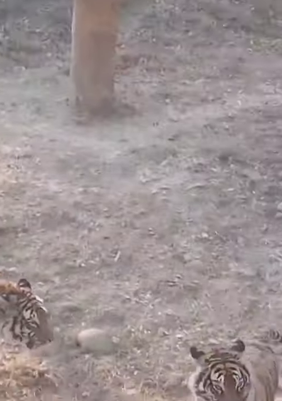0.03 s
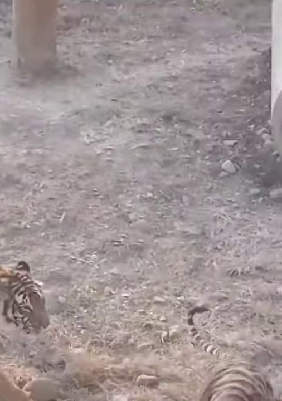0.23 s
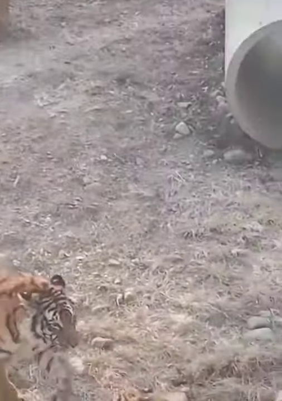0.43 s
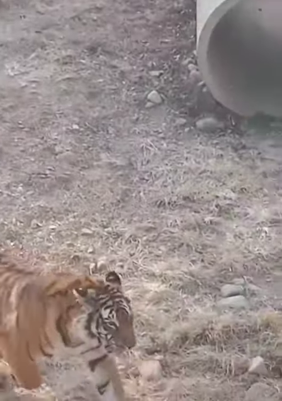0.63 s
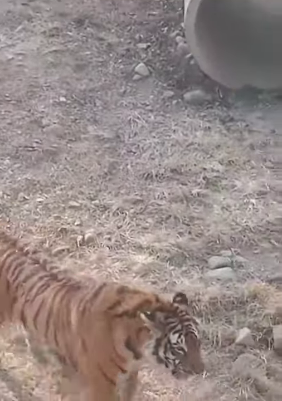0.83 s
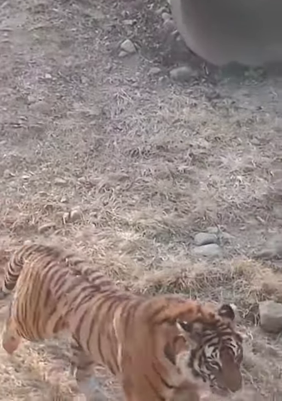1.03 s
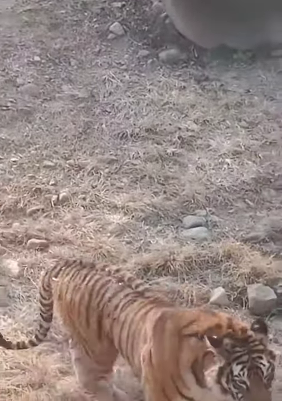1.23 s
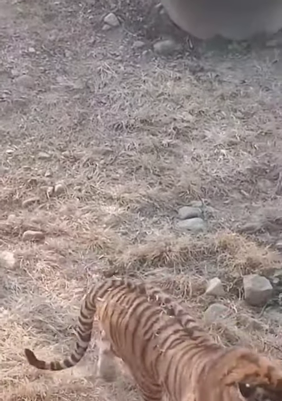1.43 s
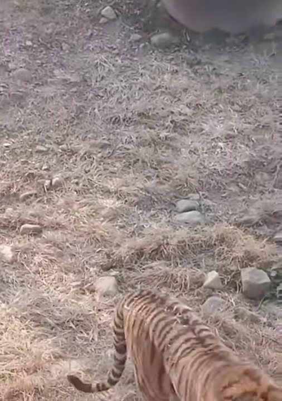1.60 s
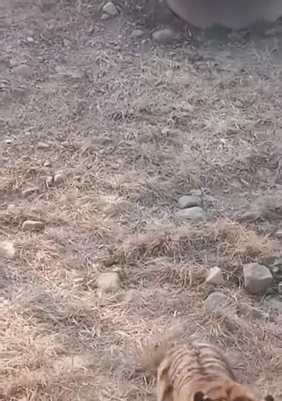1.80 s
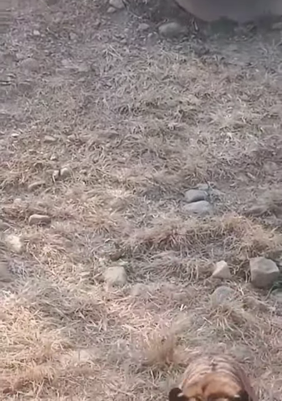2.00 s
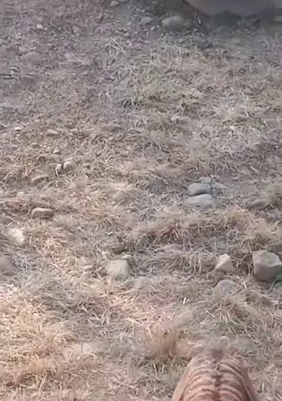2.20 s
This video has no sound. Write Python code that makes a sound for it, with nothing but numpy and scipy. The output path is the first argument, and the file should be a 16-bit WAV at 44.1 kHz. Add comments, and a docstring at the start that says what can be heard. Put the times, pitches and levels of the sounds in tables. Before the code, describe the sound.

A tiger starts with a rough, throbbing growl on an in-breath. At about 0.4 seconds it breathes out in a raspy roar that fades by 1.1 seconds. A second, quieter growl follows with small catches in the throat. At about 1.7 seconds comes the loudest roar, rising in pitch, then falling away just after 2 seconds. A nearby phone picks up short echoes and faint outdoor air.

```python
"""One big cat on open ground growls as it breathes in and roars as it breathes out, twice over.
Its vocal folds beat unevenly and its breath rushes, both throbbing as loose tissue flaps.
This makes the chest, throat, mouth and nose ring; now and then the throat catches and bursts open.
Behind it are faint outdoor air and short echoes, all heard through a nearby phone."""
import sys
import numpy as np
from scipy import signal
from scipy.fft import rfft, irfft
from scipy.io import wavfile
from scipy.ndimage import uniform_filter1d, map_coordinates

SR = 44100
rng = np.random.default_rng(int(sys.argv[2]) if len(sys.argv) > 2 else 0)


def to_wav(sig):
    """Store sig (one row per channel, or 1-D mono) as 16-bit WAV at the path in sys.argv[1].

    Samples outside -1..1 are clipped; the rate is SR.
    """
    pcm = np.clip(np.atleast_2d(sig), -1, 1) * 32767
    pcm = np.round(pcm).astype(np.int16)
    wavfile.write(sys.argv[1], SR, pcm.T)  # frames by channels


N = 99357


def amp(db):
    """Turns decibels into a number to multiply by."""
    return 10 ** (np.asarray(db) / 20)


def unit_level(x):
    """Scales a sound to an average power of 1."""
    return x / np.sqrt(np.mean(x ** 2) + 1e-20)


def steady(x):
    """Evens out loudness changes slower than about 35 ms, keeping the fine grain."""
    power = abs(uniform_filter1d(x ** 2, int(0.035 * SR)))
    return x / np.sqrt(power + 0.006 * np.mean(x ** 2) + 1e-20)


def look_up(points, hz):
    """Reads between the rows of a frequency table."""
    f, value = np.transpose(points)
    return np.interp(np.log(hz + 1), np.log(f + 1), value)


def colour(x, points):
    """Turns lows and highs up or down by a table of f/Hz, level/dB."""
    return irfft(rfft(x) * amp(look_up(points, np.fft.rfftfreq(len(x), 1 / SR))), len(x))


def wander(count, per_s):
    """A smooth random wiggle, about 1 in size, that changes about per_s times a second."""
    steps = rng.standard_normal(int(count / SR * 400) + 3)
    return map_coordinates(steps, [np.arange(count) / SR * per_s], order=3, prefilter=False) * 1.45


def resonate(x, hz, width):
    """A hollow space rings near hz, which may move: shift the sound down, smooth twice, shift back."""
    spin = np.exp(2j * np.pi * np.cumsum(hz * np.ones(len(x))) / SR)
    r = np.exp(-np.pi * width / SR)
    return 2 * (spin * signal.lfilter([(1 - r) ** 2], [1, -2 * r, r * r], x / spin + 1e-18)).real


def drifting_ring(x, hz, width):
    """A hollow space whose note drifts by a few percent."""
    return unit_level(resonate(x, hz * (1 + 0.046 * wander(len(x), 9.25)), width))


# Tone of the outdoor air: f/Hz, level/dB
AIR_TONE = [(40, 5.5), (150, 4), (500, 2), (1000, -2.5), (7000, -24), (12000, -25)]
def outdoor_air(level_db=-43):
    """A faint, even rush of mostly low noise."""
    return amp(level_db) * unit_level(colour(rng.standard_normal(N), AIR_TONE))


def echoes(x, fade_s=0.26, level_db=-7):
    """Sound scatters back off the ground and walls and soon dies away."""
    t = np.arange(SR // 2) / SR
    tail = rng.standard_normal(len(t)) * amp(-60 * t / fade_s) * (t > .004)
    return amp(level_db) * signal.fftconvolve(x, tail / np.linalg.norm(tail))[:N]


# How much louder the left side is than the right: f/Hz, level/dB
LEFT_LEAN = [(480, -.5), (800, .5), (1350, 3.5), (3800, 4.5), (6000, -1.5)]
# How far the left wave runs ahead of the right: f/Hz, phase/rad
LEFT_LEAD = [(3000, 0), (4300, 5), (9000, -2.5)]
# Smeared sound, added on the left and taken away on the right: f/Hz, level/dB
SPREAD = [(60, -36), (125, -33), (250, -18), (500, -12), (800, -10), (1300, -1), (2500, -8), (6000, -5)]
def two_microphones(x):
    """The sound reaches the phone's left and right openings with its own level and timing."""
    hz = np.fft.rfftfreq(N, 1 / SR)
    smear = rfft(rng.standard_normal(4000) * amp(-40 * np.arange(4000) / 4000), N)
    lean, lead = amp(look_up(LEFT_LEAN, hz) / 2), np.exp(.5j * look_up(LEFT_LEAD, hz))
    middle = rfft(x)
    side = middle * amp(look_up(SPREAD, hz)) * smear / abs(smear)
    return irfft(np.array([(middle + side) * lean * lead, (middle - side) / lean / lead]), N)


# Loudness of the breath's hiss: t/s, level/dB
HISS_LEVELS = [(0.1, -58), (0.38, -65), (0.42, -40), (0.6, -40), (0.75, -47.5), (1.09, -51.5), (1.2, -60),
               (1.62, -74), (1.71, -45.5), (1.9, -50.5), (2.18, -69.5)]
# Tone of that hiss: f/Hz, level/dB
HISS_TONE = [(4000, -41), (5000, 7.5), (6600, -4.5), (9000, -16)]
def breath_hiss(t, breath):
    """Rushing breath makes a high, flickering hiss."""
    level_db = np.interp(t, *np.transpose(HISS_LEVELS)) + 2.5 * wander(len(t), 20)
    return amp(level_db) * steady(colour(breath, HISS_TONE))


# Moments when the throat bursts open and rings: t/s, level/dB, f/Hz
THROAT_SNAPS = [(0.25, -13.5, 709), (0.862, -19.5, 635), (1.255, -12, 784), (1.383, -22.5, 780),
                (1.485, -16, 773), (1.523, -20.5, 383), (1.566, -26, 356), (1.734, 1, 754),
                (1.871, -4, 630), (1.934, -3.5, 613), (2.062, -13.5, 857)]
def throat_snaps(t, width_hz=47, rise_s=.002, settle_s=.014):
    """The throat catches, then pops open. Gives the pops and the dip and swell of the airflow."""
    marks, pops = np.zeros((2, len(t)))
    for at, level_db, hz in THROAT_SNAPS:
        if t[0] <= at < t[-1]:
            marks[int((at - t[0]) * SR)] = 1
            age = np.maximum(t - at, 0)
            shape = np.tanh(age / rise_s) ** 2 * np.exp(-np.pi * width_hz * age)
            pops += amp(level_db) * shape * np.sin(2 * np.pi * hz * age)
    fading = lambda x: signal.lfilter([1], [1, -np.exp(-1 / (settle_s * SR))], x)
    choke = np.minimum(fading(marks[::-1])[::-1] - marks, 1)  # builds up just before each pop
    flow = 1 + .7 * fading(marks) - .55 * choke
    return pops, uniform_filter1d(flow, size=int(rise_s * SR))


# High rings of the rasp: f/Hz, width/Hz, then level/dB in each of the four calls
RASP_RINGS = [(1337, 370, -3, -3.5, -6, 4), (1855, 420, -8, -9, -2.5, -1.5), (2302, 796, -12, -8, -3, -1),
              (3528, 770, -9.5, -9, -15.5, -7)]
def rasp(drive, which):
    """Breathy pulses stir several high rings, each flickering on its own."""
    sound = 0
    for k, (hz, width, *levels_db) in enumerate(RASP_RINGS):
        flicker_db = 2.5 * wander(len(drive), 23.94)
        sound += (-1) ** k * amp(levels_db[which] + flicker_db) * drifting_ring(drive, hz, width)
    return steady(sound)


# Broad sound that spills between the rings: f/Hz, level/dB
SPILL_TONE = [(40, -25.5), (90, 2.5), (250, 10), (700, 17), (1000, -25), (1200, -76), (2500, -15)]
# Hollows beside the mouth: f/Hz, width/Hz, then level/dB against the mouth in each of the four calls
SIDE_HOLLOWS = [(487.5, 71, -15, -2.5, -9.5, -5.5), (648.3, 46, -8, -8, -9, -17)]
def mouth(drive, hz, width, which):
    """The mouth rings at a moving note, with weaker rings from the hollows beside it."""
    sound = unit_level(resonate(drive, hz, width)) + amp(-18) * unit_level(colour(drive, SPILL_TONE))
    for side_hz, side_width, *levels_db in SIDE_HOLLOWS:
        sound += amp(levels_db[which]) * drifting_ring(drive, side_hz, side_width)
    return steady(sound)


def chest_voice(drive, throb, pitch, width, waver, breathy, rumble_db):
    """The voice's lowest note, part pure and part breathy, over the rumble of the chest."""
    cycles = np.cumsum(pitch * (1 + waver * wander(len(drive), 41.2))) / SR
    pure = unit_level(np.sin(2 * np.pi * cycles) * throb ** .5)
    rough = unit_level(resonate(drive, pitch, width))
    rumble = amp(rumble_db) * drifting_ring(drive, hz=96, width=64)
    return steady((1 - breathy) * pure + breathy * rough) + rumble


def flapping_tissue(n, flap_hz, depth_db):
    """Loose tissue flaps unevenly: with each flap the loudness jumps up, then sinks."""
    flaps = np.cumsum(flap_hz * (1 + .45 * wander(n, 25))) / SR + rng.random()
    swing_db = depth_db * (1 - 2 * (flaps % 1)) * (1 + .5 * wander(n, 39))
    return amp(uniform_filter1d(swing_db, size=130))


def vocal_folds(pitch, jitter=.35, shimmer_db=2.5):
    """Each beat of the folds, uneven in timing and strength, gives a sharp pulse and a puff of air."""
    n = len(pitch)
    beats = np.cumsum(pitch * np.clip(1 + jitter * wander(n, 200), .2, 3)) / SR
    pulses = np.diff(np.floor(beats), prepend=0) * amp(shimmer_db * rng.standard_normal(n))
    puffs = (.5 + np.exp(-(beats % 1) / 0.86)) * rng.standard_normal(n)
    return unit_level(pulses - pulses.mean()), unit_level(puffs)


# Character of each call: throat width/Hz, voice width/Hz, mouth width/Hz, flap rate/Hz, throb/dB,
# air share/0-1, pitch waver/0-1, breathy share/0-1, chest rumble against the voice/dB
CALL_STYLES = [(110, 110, 130, 34, 6.5, 0.58, .06, 0.6, -1.5), (22.2, 41, 124, 26, 3, 0.47, 0.05, 0.44, -5),
               (110, 87, 130, 30, 5, 0.34, 0, 0.8, -2), (56.3, 56, 205, 30, 2, 0.52, 0, 0.35, -31)]
def cat_call(t, rows, which, rasp_air=.76):
    """One growl or roar (which = 0 to 3): throbbing pulses and air ring chest, throat, mouth and nose."""
    throat_width, voice_width, mouth_width, flap_hz, throb_db = CALL_STYLES[which][:5]
    air, waver, breathy, rumble_db = CALL_STYLES[which][5:]
    times, *columns = np.transpose(rows)
    curves = (np.interp(t, times, column) for column in columns)
    pitch, voice_db, throat_hz, throat_db, mouth_hz, mouth_db, nose_hz, nose_db, rasp_db = curves
    throb = flapping_tissue(len(t), flap_hz, throb_db)
    pulses, puffs = vocal_folds(pitch)
    drive = throb * ((1 - air) * pulses + air * puffs)
    airy_drive = throb * ((1 - rasp_air) * pulses + rasp_air * puffs)
    pops, flow = throat_snaps(t)
    return (amp(voice_db) * chest_voice(drive, throb, pitch, voice_width, waver, breathy, rumble_db)
            + np.sqrt(flow) * amp(throat_db) * steady(resonate(drive, throat_hz, throat_width))
            + flow * amp(mouth_db) * mouth(drive, mouth_hz, mouth_width, which)
            + amp(nose_db) * steady(resonate(drive, nose_hz, width=82))
            + flow * amp(rasp_db) * rasp(airy_drive, which)
            + pops + breath_hiss(t, puffs * throb ** .5))


# How each call moves: t/s, then f/Hz, level/dB for voice, throat, mouth and nose, then rasp level/dB
FIRST_GROWL = [(0.0, 189.3, -22.5, 374, -35, 532, -14.5, 950, -28, -27.5),
               (0.084, 196.5, -26.5, 311, -38.5, 534, -28.5, 898, -34, -37.5),
               (0.152, 136.3, -39, 291, -52.5, 796, -27, 900, -42.5, -29),
               (0.281, 144.4, -33.5, 356, -35.5, 655, -31, 906, -38, -38.5),
               (0.382, 135.5, -54.5, 318, -61.5, 559, -54, 940, -55, -51)]
LONG_ROAR = [(0.38, 138.7, -68.5, 353, -70, 642, -59, 880, -63, -59),
             (0.405, 143.1, -37, 370, -52.5, 648, -29, 856, -45, -29),
             (0.508, 146.1, -20, 352.4, -18.5, 814, -19, 855, -18, -21.5),
             (0.58, 147.3, -22, 343, -20.5, 837, -17, 868, -34, -24.5),
             (0.636, 129.3, -37.5, 360.5, -16.5, 777, -20, 839, -21, -29),
             (0.731, 141.4, -21.5, 362.6, -15, 766, -22, 839, -24, -30.5),
             (0.796, 134.1, -27.5, 344, -44.5, 604, -23.5, 926, -33.5, -33),
             (0.95, 131.9, -23, 369, -31, 621, -23.5, 918, -32, -33.5),
             (1.084, 122.4, -40, 366.6, -40.5, 590, -33.5, 897, -43.5, -39),
             (1.13, 123.4, -42, 361, -65.5, 712, -57.5, 930, -51.5, -50.5)]
SECOND_GROWL = [(1.13, 130, -54.5, 393, -67.5, 545, -65.5, 1064, -69, -61),
                (1.169, 130.3, -51.5, 403, -74.5, 684, -30, 1095, -42.5, -46.5),
                (1.202, 134.7, -32, 290, -44, 766, -23.5, 1083, -42, -35.5),
                (1.35, 138.1, -34, 288, -33, 805, -33.5, 1090, -53.5, -36.5),
                (1.459, 138.6, -32.5, 314, -42.5, 776, -39.5, 1080, -44.5, -38.5),
                (1.544, 136.5, -30, 345, -39, 804, -39.5, 1010, -48, -42.5),
                (1.629, 134.9, -71, 365, -47, 750, -49, 1118, -77.5, -68)]
LOUD_ROAR = [(1.63, 141.1, -61.5, 337, -58, 681, -71.5, 877, -77, -80),
             (1.695, 159.7, -16.5, 338, -17, 722, -22, 907, -34, -33),
             (1.734, 245.4, -14.5, 365.6, -12.5, 733, -16, 897, -18.5, -28),
             (1.78, 290.4, -11.5, 374, -27, 716, -13.5, 848, -22.5, -30.5),
             (1.85, 279.6, -14, 348, -37, 666, -14, 839, -30, -26.5),
             (1.95, 267.7, -21, 312, -21.5, 510, -17.5, 933, -22, -31.5),
             (2.03, 159.5, -35, 354, -20, 568, -29, 881, -30.5, -35),
             (2.129, 117.6, -37.5, 366.4, -25, 600, -35, 918, -41.5, -43.5),
             (2.18, 119.3, -37.5, 330, -47, 590, -41, 935, -54, -50.5)]
def big_cat():
    """The cat growls breathing in and roars breathing out, twice over without a pause."""
    sound = np.zeros(N)
    for which, rows in enumerate([FIRST_GROWL, LONG_ROAR, SECOND_GROWL, LOUD_ROAR]):
        t = np.arange(rows[0][0], rows[-1][0], 1 / SR)
        sound[round(t[0] * SR):][:len(t)] += cat_call(t, rows, which)
    return sound


def scene():
    """The cat, its echoes and the outdoor air, spread to left and right."""
    cat = big_cat()
    return two_microphones(cat + echoes(cat) + outdoor_air())


# The phone weakens deep bass and high treble: f/Hz, level/dB
PHONE_TONE = [(20, -30), (50, -14), (80, -4), (120, -0.5), (6800, 0), (7600, -11.5), (13000, -16.5)]
def record(dry, ceiling=1.05, top_hz=13000, stop_s=2.1815):
    """The phone rounds off loud peaks and trims lows and highs; the sound stops just before the end."""
    rounded = ceiling * np.tanh(dry / ceiling)
    coloured = np.array([colour(side, PHONE_TONE) for side in rounded])
    treble_cut = signal.firwin(511, top_hz, window=("kaiser", 9), fs=SR)
    out = signal.oaconvolve(coloured, treble_cut[None], "same")
    return out * np.clip((stop_s - np.arange(N) / SR) * 1000, 0, 1)


dry = scene()
out = record(dry)
to_wav(out)
```